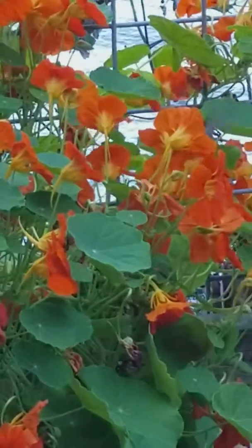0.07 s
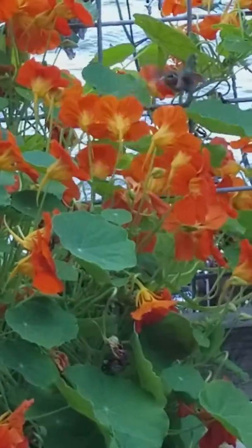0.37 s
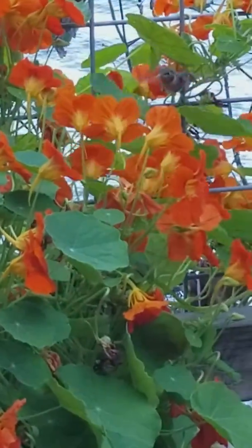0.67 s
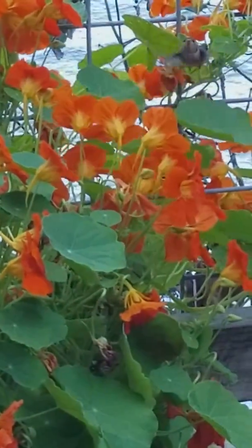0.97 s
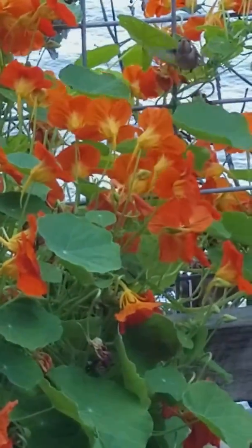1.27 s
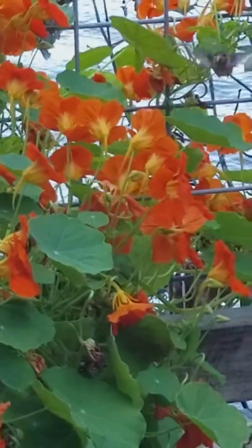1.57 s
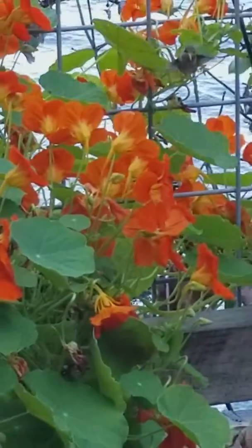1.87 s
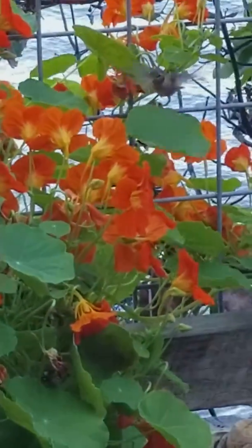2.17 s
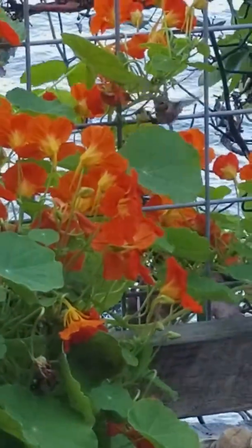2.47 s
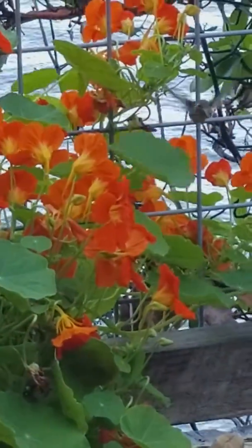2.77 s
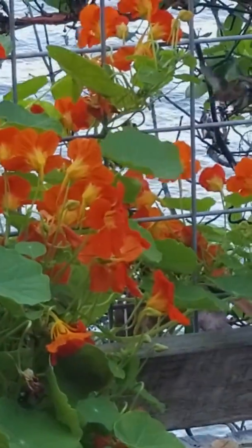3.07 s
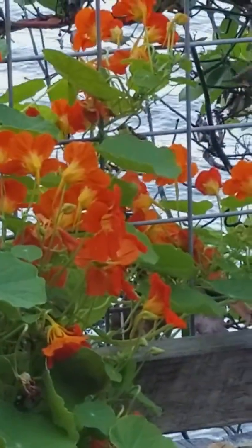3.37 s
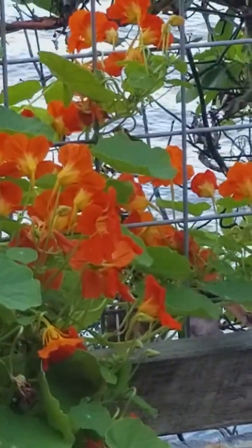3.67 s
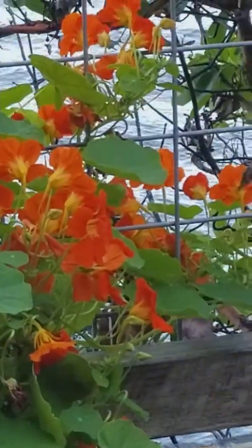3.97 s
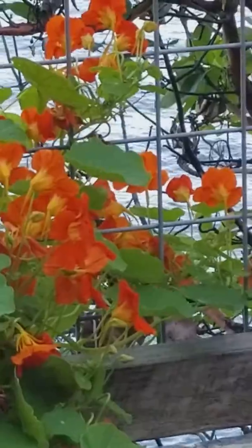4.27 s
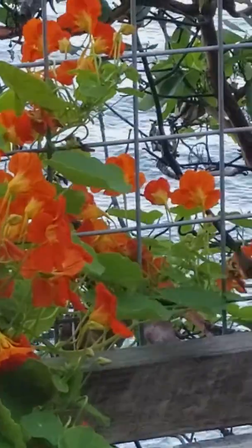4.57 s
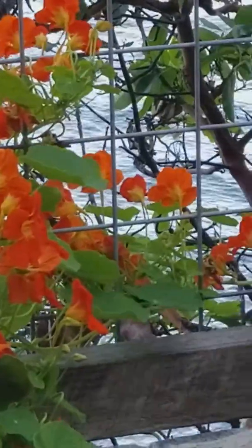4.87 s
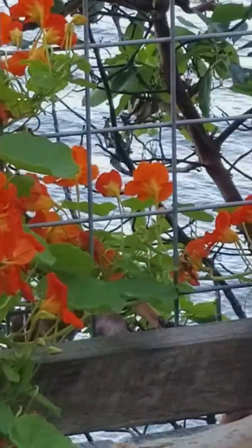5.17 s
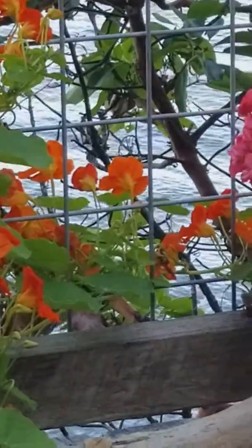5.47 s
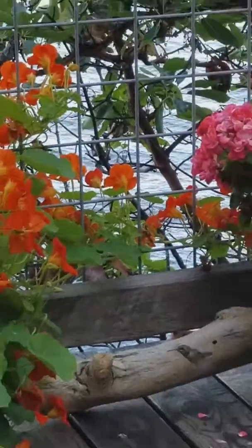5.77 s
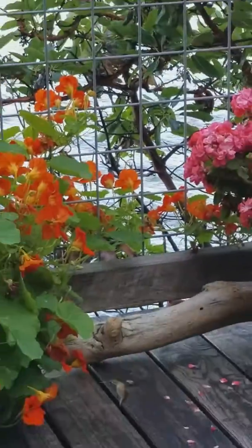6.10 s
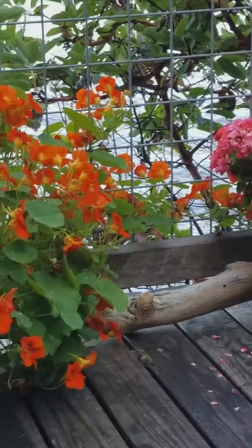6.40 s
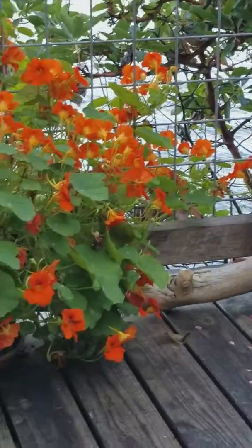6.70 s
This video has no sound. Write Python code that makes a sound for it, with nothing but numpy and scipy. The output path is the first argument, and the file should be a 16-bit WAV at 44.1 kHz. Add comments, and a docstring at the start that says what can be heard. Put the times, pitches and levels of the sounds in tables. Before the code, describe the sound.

Heard from a flowered deck by the shore, the low hum of a distant boat engine runs throughout, swelling gently as it carries over the water. Close below, small waves lap with hollow sloshes, light splashes and bubbles. A hummingbird at the flowers peeps faintly, then makes a single sharp, click-like chip. A few soft swells follow, and the whole scene stays quiet.

```python
"""Distant boat from a shore deck

A motor boat drones far out on the water: periodic firing gives its exhaust a harmonic hum,
and a gear whines faintly. Below a flowered deck small waves slosh and spill as swells of noise,
and the air they trap resonates in plops. A hummingbird at the flowers gives a faint peep,
then one sharp chip, a falling whistle scattered by the surfaces nearby."""
import sys
import numpy as np
from scipy import signal
from scipy.fft import rfft, irfft
from scipy.io import wavfile

SR = 44100
rng = np.random.default_rng(int(sys.argv[2]) if len(sys.argv) > 2 else 0)


def generate_wav(sig):
    """Save sig (samples, or channels by samples) to the path in sys.argv[1] as 16-bit PCM at SR."""
    pcm = np.round(np.clip(np.atleast_2d(sig).T, -1, 1) * 32767).astype(np.int16)
    wavfile.write(sys.argv[1], SR, pcm)


N = 306054
TIME = np.arange(N) / SR


def gain_of(db):
    """The decibel scale: 20 dB is a factor of ten in amplitude."""
    return 10 ** (np.asarray(db) / 20)


def unit_rms(x):
    """Normalisation to unit mean power."""
    return x / np.sqrt(np.mean(x ** 2) + 1e-20)


def level_at(spectrum, hz):
    """Interpolation of a spectrum on a logarithmic frequency axis."""
    frequencies, levels = np.transpose(spectrum)
    return np.interp(np.log(hz + 1), np.log(frequencies), levels)


def follow(curve):
    """Linear interpolation of a time curve at every sample."""
    return np.interp(TIME, *np.transpose(curve))


def drift(rate_hz):
    """Random modulation: low-pass noise with an rms of 1."""
    hz = np.fft.rfftfreq(N, 1 / SR)
    return unit_rms(irfft(rfft(rng.standard_normal(N)) * np.exp(-(hz / rate_hz) ** 2), N))


def add(mix, start_s, sound):
    """Superposition of a stereo sound from a given time."""
    part = mix[:, max(round(start_s * SR), 0):][:, :sound.shape[1]]
    part += sound[:, :part.shape[1]]


def surges(rows, rest_db, roundness=1.6, rise=.8, settle=1.2):
    """Incoherent sources add in power: the amplitude of water that heaves, then settles more slowly."""
    power = gain_of(rest_db) ** 2
    for peak_s, half_length_s, db in rows:
        span_s = half_length_s * np.where(TIME < peak_s, rise, settle)
        power = power + gain_of(db) ** 2 * np.exp(-abs((TIME - peak_s) / span_s) ** roundness)
    return np.sqrt(power)


# Stereo width, growing with frequency: frequency_hz, side_minus_mid_db
STEREO_WIDTH = [(110, -41), (200, -27), (380, -19), (700, -16), (1290, -9.7), (2400, -12), (4400, -9),
                (8100, -7), (15000, -6)]
# Lean to the right: frequency_hz, left_minus_right_db
STEREO_BALANCE = [(700, 0), (1300, -1.5), (2400, -4.3), (4400, -2), (8000, -.3), (15000, -.5)]
def colour(drive, spectrum, band_hz=(0, SR)):
    """Spectral shaping of two independent drives as mid and side; the mid has unit rms in the band."""
    hz = np.fft.rfftfreq(N, 1 / SR)
    mid, side = rfft(drive) * gain_of(level_at(spectrum, hz))
    side = side * gain_of(level_at(STEREO_WIDTH, hz))
    lean = gain_of(level_at(STEREO_BALANCE, hz) / 2)
    in_band = irfft(mid * (hz > band_hz[0]) * (hz < band_hz[1]), N)
    return irfft(np.array([(mid + side) * lean, (mid - side) / lean]), N) / in_band.std()


# Engine speed, sagging slowly: time_s, firing_rate_hz
FIRING_RATE = [(0, 111.8), (2.2, 111.3), (4.5, 110.6), (6.9, 110.35)]
# Firing tone, its octave and gear whine, fading and returning over the water: time_s, level_db
FIRING_LEVEL = [(0, -46), (.68, -45.5), (.9, -37.5), (1.32, -36), (2.1, -38.5), (2.45, -34), (2.85, -33),
                (3.7, -35), (4.55, -35.5), (5.29, -32.5), (5.57, -36.5), (6.3, -38), (6.9, -37)]
OCTAVE_LEVEL = [(0, -38), (.44, -50.5), (.84, -44), (1.5, -53.5), (1.7, -47.5), (2.6, -50.5), (3.7, -55.5),
                (4.5, -47), (4.75, -52), (4.97, -46), (5.35, -49), (5.55, -56), (6.9, -52)]
WHINE_LEVEL = [(0, -65), (.78, -66), (.92, -59), (1.8, -60), (2.4, -64.5), (2.75, -57.5), (3.22, -54),
               (3.35, -68.5), (4.33, -64.5), (4.55, -52), (4.7, -69.5), (4.88, -50.5), (5.05, -61.5),
               (5.19, -52.5), (5.7, -52.5), (5.9, -60), (6.5, -61), (6.9, -50.5)]
# Deepest exhaust tone, dying away late: time_s, level_db
THROB_LEVEL = [(0, -49.5), (4.3, -48.5), (5.2, -46.5), (5.9, -50.5), (6.9, -56)]
# Other exhaust tones: multiple_of_cycle_rate, level_db
EXHAUST_ORDERS = [(7, -66), (8, -57), (9, -53), (11, -62), (14, -61), (16, -62.5), (18, -79), (20, -74),
                  (22, -69.5), (31, -68), (33, -71.5), (35, -66), (36, -73)]
def engine(cylinders=6, gear_order=42.5, throb_order=4, waver=0.44):
    """Engine orders are multiples of the cycle rate; unequal cylinders fill in between firing tones."""
    cycles = np.cumsum(follow(FIRING_RATE) / cylinders) / SR

    def tone(order, db, depth, rate_hz):
        """Propagation through moving air and over water modulates amplitude and phase."""
        path = 1 + depth * (drift(rate_hz) + 1j * drift(rate_hz))
        carrier = np.exp(2j * np.pi * (order * cycles + rng.random()))
        return gain_of(db) * unit_rms((path * carrier).real)

    out = tone(cylinders, follow(FIRING_LEVEL), depth=0.064, rate_hz=28)
    out += tone(2 * cylinders, follow(OCTAVE_LEVEL), depth=0.064, rate_hz=7.4)
    out += tone(gear_order, follow(WHINE_LEVEL), depth=0.18, rate_hz=20)
    out += tone(throb_order, follow(THROB_LEVEL), depth=0.11, rate_hz=5.5)
    for order, db in EXHAUST_ORDERS:  # shorter wavelengths waver more
        out += tone(order, db, depth=waver * order / (2 * cylinders), rate_hz=1.43)
    return out


# Low roar of the exhaust: frequency_hz, density_db
ROAR_SPECTRUM = [(20, -27), (35, -14), (55, -3.5), (90, -2), (125, 0.5), (190, -3), (260, -7.5), (350, -19),
                 (500, -24), (2000, -74)]
def exhaust_roar(level_db=-51):
    """Stationary noise: the continuous spectrum beneath the exhaust's harmonics."""
    return colour(rng.standard_normal((2, N)), ROAR_SPECTRUM) * gain_of(level_db)


# Hollow slosh against the shore: frequency_hz, density_db
SLOSH_SPECTRUM = [(100, -12), (230, -2.5), (290, 4), (400, -3), (520, -12), (1200, -46)]
# Swells reaching the shore: peak_s, half_length_s, relative_level_db
SWELLS = [(2.08, 0.092, -51.5), (2.68, 0.043, -47.5), (3.05, 0.17, -50), (3.62, 0.065, -51),
          (4.08, 0.15, -54), (5.25, .2, -54)]
def slosh(gain_db=-3):
    """Amplitude modulation: each swell lifts a hollow band of noise."""
    hollow = colour(rng.standard_normal((2, N)), SLOSH_SPECTRUM, band_hz=(270, 450))
    return hollow * surges(SWELLS, rest_db=-57) * gain_of(gain_db)


# Rumble of open water: frequency_hz, density_db
RUMBLE_SPECTRUM = [(150, -8), (360, -14), (480, -0.5), (640, -0.5), (900, -4), (1250, -8.5), (1600, -13.5),
                   (2500, -19), (6000, -59)]
# Its rise and fall: time_s, relative_level_db
RUMBLE_LEVEL = [(0, -57.5), (.9, -55.5), (1.4, -57.5), (1.75, -56.5), (1.98, -60.5), (2.45, -59.5),
                (2.65, -56), (3.35, -59.5), (3.56, -55), (3.85, -58.5), (4.88, -59.5), (5.15, -54),
                (6.6, -59), (6.9, -53)]
def open_water(gain_db=-2):
    """Open water radiates dull broadband noise under a slow envelope."""
    rumble = colour(rng.standard_normal((2, N)), RUMBLE_SPECTRUM, band_hz=(470, 740))
    return rumble * gain_of(follow(RUMBLE_LEVEL) + gain_db)


# Far wash along the shore: frequency_hz, density_db
WASH_SPECTRUM = [(200, -11), (600, 1), (1100, 1.5), (1700, 0.5), (2450, -1), (3100, -11), (4000, -17),
                 (5200, -28.5), (8000, -34), (15000, -45)]
# Its rise and fall: time_s, relative_level_db
WASH_LEVEL = [(0, -59), (1.1, -60), (2.5, -61.5), (2.7, -60), (3.6, -58.5), (4.4, -60.5), (5, -62.5),
              (5.45, -59), (6.15, -60.5), (6.6, -60.5), (6.9, -62)]
def wash(gain_db=-2, ripple_db=1.95):
    """Incoherent summation: many distant wavelets merge into a soft, rippling rush."""
    rush = colour(rng.standard_normal((2, N)), WASH_SPECTRUM, band_hz=(1000, 2800))
    return rush * gain_of(follow(WASH_LEVEL) + gain_db + ripple_db * drift(rate_hz=20))


# Wavelets breaking close by: peak_s, half_length_s, relative_foam_db, relative_spray_db
WAVELETS = [(0.361, .05, -76, -92), (.66, .11, -73.5, -87), (0.971, .04, -73.5, -86),
            (1.286, .04, -65.5, -82), (1.76, .17, -72, -86), (2.22, .06, -69.5, -90), (2.76, .12, -69, -84),
            (3.06, .06, -70.5, -89), (3.61, .1, -62, -75), (3.901, .1, -74.5, -92), (4.14, .07, -62.5, -72),
            (4.671, .11, -72.5, -83), (5.158, .11, -73.5, -91), (5.91, .085, -66.5, -75),
            (6.14, .12, -70.5, -82), (6.44, .06, -70.5, -76), (6.82, .14, -71.5, -83)]
def breaking(calm_db=-84, full_wave_db=-61):
    """The amplitude envelope of the near breaking water, 1 at the height of a full wave."""
    foam = [(peak_s, half_length_s, db) for peak_s, half_length_s, db, _ in WAVELETS]
    return surges(foam, calm_db) / gain_of(full_wave_db)


# Small waves spilling: frequency_hz, density_db
SPILL_SPECTRUM = [(200, -3.5), (600, -7), (1300, -4.5), (2400, 0), (3100, -6), (4000, -7), (5200, -15.5),
                  (6600, -20), (7900, -18), (9500, -26.5), (16000, -40)]
def spill(level_db=-64, growth=0.77, drops_per_s=2500, spread_db=2, churn_db=1.8):
    """Shot noise of droplets and hiss of foam grow as a power of the wave's strength."""
    sizes = gain_of(spread_db * np.minimum(rng.exponential(1, (2, N)), 4))
    signs = rng.choice([-1, 1], (2, N))
    drops = unit_rms(sizes * signs * (rng.random((2, N)) < drops_per_s / SR))
    foam = rng.standard_normal((2, N))
    fizz = colour(drops + foam, SPILL_SPECTRUM, band_hz=(3500, 7000))
    return fizz * breaking() ** growth * gain_of(level_db + churn_db * drift(rate_hz=14.5))


# Fine spray thrown by the waves: frequency_hz, density_db
SPRAY_SPECTRUM = [(1500, -16), (4500, -3), (8000, 3), (10000, 1.5), (13000, 3.5), (16000, -6)]
def spray(gain_db=-1, flight_s=.018, drops_per_s=5000):
    """Impact noise: tiny droplets land after a short flight, in a brief bright hiss."""
    drops = unit_rms(rng.standard_normal((2, N)) * (rng.random((2, N)) < drops_per_s / SR))
    mist = rng.standard_normal((2, N))
    patter = colour(drops + mist, SPRAY_SPECTRUM, band_hz=(9000, 15000))
    landings = [(peak_s + flight_s, half_length_s, db) for peak_s, half_length_s, _, db in WAVELETS]
    return patter * surges(landings, rest_db=-93) * gain_of(gain_db)


def bubble(hz, peak_db, left_minus_right_db, decay_at_1khz_s=0.008, rise=.04):
    """Damped resonance of trapped air, rising a little in pitch; larger bubbles ring longer."""
    lifetime_s = decay_at_1khz_s * np.sqrt(1000 / hz)
    age = np.arange(0, 6, 1 / (SR * lifetime_s))  # in lifetimes
    phase = 2 * np.pi * np.cumsum(hz * (1 + rise * (age - .5))) / SR
    envelope = (1 - np.exp(-age / 0.42)) * np.exp(-age)
    pan = gain_of(left_minus_right_db * np.array([[.5], [-.5]]))
    return pan * gain_of(peak_db) * envelope / envelope.max() * np.sin(phase)


def under_deck(sound, wet=0.26, t60_s=0.1):
    """Reverberation: dense reflections under the deck decay exponentially."""
    age_s = np.arange(SR // 4) / SR
    echoes = rng.standard_normal((2, len(age_s))) * gain_of(-60 * age_s / t60_s)
    return sound + wet * signal.oaconvolve(sound, echoes / np.linalg.norm(echoes[0]), axes=1)[:, :N]


# Prominent bubbles trapped by the waves: start_s, pitch_hz, relative_peak_db
PLOPS = [(1.257, 2300, -50), (2.03, 324, -46), (2.065, 2490, -51), (2.195, 408, -49), (2.65, 356, -47.5),
         (3.522, 1960, -50), (3.545, 700, -46), (3.608, 417, -44.5), (3.711, 800, -42.5),
         (4.123, 2240, -50), (4.699, 2670, -53.5), (5.444, 1710, -49), (5.92, 2230, -47.5)]
def bubbles(plop_gain_db=-1, small_db=-66, growth=0.089, spread_db=3.5, low_hz=900, high_hz=4200):
    """Air entrainment: a few plops and many faint bubbles, densest as a wave spills."""
    out = np.zeros((2, N))
    for start_s, hz, db in PLOPS:
        add(out, start_s, bubble(hz, db + plop_gain_db, level_at(STEREO_BALANCE, hz)))
    strength = breaking()
    spilled = np.cumsum(strength)
    for when, pitch, loudness, side in rng.random((900, 4)):  # one row per faint bubble
        onset = np.searchsorted(spilled, when * spilled[-1])
        hz = low_hz * (high_hz / low_hz) ** pitch
        db = small_db + level_at(WASH_SPECTRUM, hz) + spread_db * min(-np.log(1 - loudness), 2.5)
        lean_db = level_at(STEREO_BALANCE, hz) + 12 * (side - .5)
        ring = bubble(hz, db, lean_db, decay_at_1khz_s=0.0088)
        add(out, onset / SR, strength[onset] ** growth * ring)
    return under_deck(out)


# Body of a wave slapping the shore: frequency_hz, density_db
SLAP_SPECTRUM = [(250, -10), (600, 0), (1100, -2), (1800, 1.5), (2500, -6), (3300, -12), (6000, -33.5)]
def slap(level_db=-57.5, growth=1.55, lumpy_db=3):
    """Impact on the shore: a lumpy splash grows faster than the wave, so larger waves stand out."""
    splash = colour(rng.standard_normal((2, N)), SLAP_SPECTRUM, band_hz=(1000, 2800))
    return splash * breaking() ** growth * gain_of(level_db + lumpy_db * drift(rate_hz=31))


# The hummingbird's thin peep: frequency_hz, density_db
PEEP_SPECTRUM = [(6500, -60), (7800, -14), (8300, 0), (8800, -14), (10500, -60)]
def peep(peak_s=1, half_length_s=.025, level_db=-79):
    """Scattering by foliage blurs a faint high note into narrow-band noise."""
    envelope = np.exp(-((TIME - peak_s) / half_length_s) ** 2)
    return colour(rng.standard_normal((2, N)), PEEP_SPECTRUM) * gain_of(level_db) * envelope


def scatter(call, lean_db=2, first_echo_s=0.0038, early_t60_s=0.1, tail_t60_s=0.33):
    """Multipath propagation: the direct sound, then sparse echoes from leaves, fence and deck."""
    age_s = np.arange(SR // 2) / SR
    shared, left, right = rng.standard_normal((3, len(age_s))) * (rng.random((3, len(age_s))) < .1)
    taps = (shared + 0.36 * np.array([left, right])) * (age_s > first_echo_s)
    paths = np.zeros_like(taps)
    paths[:, 0] = gain_of([lean_db, -lean_db])  # direct path, louder on the left
    for echo_db, t60_s in (-1, early_t60_s), (-14, tail_t60_s):
        echoes = taps * gain_of(-60 * age_s / t60_s)
        paths += gain_of(echo_db) * echoes / np.linalg.norm(echoes[0])
    return signal.fftconvolve(call[None], paths, axes=1)


# The hummingbird's falling whistle: age_s, pitch_hz, level_db
CHIP_SWEEP = [(0, 8840, -68), (.0015, 7900, -55), (.003, 7780, -47.5), (.0045, 6530, -55),
              (.007, 5150, -57), (.011, 3696, -61), (.015, 1823, -58), (0.021, 990, -45)]
def chip(start_s=1.9775, octave_db=-61):
    """A steep downward frequency sweep with its second harmonic is heard as one sharp chip."""
    knots_s, pitch_hz, level_db = np.transpose(CHIP_SWEEP)
    age_s = np.arange(0, knots_s[-1], 1 / SR)
    phase = 2 * np.pi * np.cumsum(np.interp(age_s, knots_s, pitch_hz)) / SR
    call = gain_of(np.interp(age_s, knots_s, level_db)) * np.sin(phase)
    call += gain_of(octave_db) * signal.windows.tukey(len(age_s), .3) * np.sin(2 * phase)
    out = np.zeros((2, N))
    add(out, start_s, scatter(call))
    return out


def scene():
    """Linear superposition of boat, water and bird."""
    boat = engine() + exhaust_roar()
    water = slosh() + open_water() + wash() + spill() + spray() + bubbles() + slap()
    return boat + water + peep() + chip()


# Steady hiss of the microphone: frequency_hz, density_db
HISS_SPECTRUM = [(100, 14), (5000, 1.5), (6800, -1), (7700, 2), (9200, -2), (12500, -2), (16000, -2)]
def record(dry, hiss_db=-71.5, cutoff_hz=15750):
    """Microphone self-noise sets the noise floor; a low-pass filter limits the bandwidth."""
    hiss = gain_of(hiss_db) * colour(rng.standard_normal((2, N)), HISS_SPECTRUM)
    low_pass = signal.firwin(1023, cutoff_hz, window=("kaiser", 9), fs=SR)
    return signal.oaconvolve(dry + hiss, low_pass[None], "same")


dry = scene()
out = record(dry)
generate_wav(out)
```